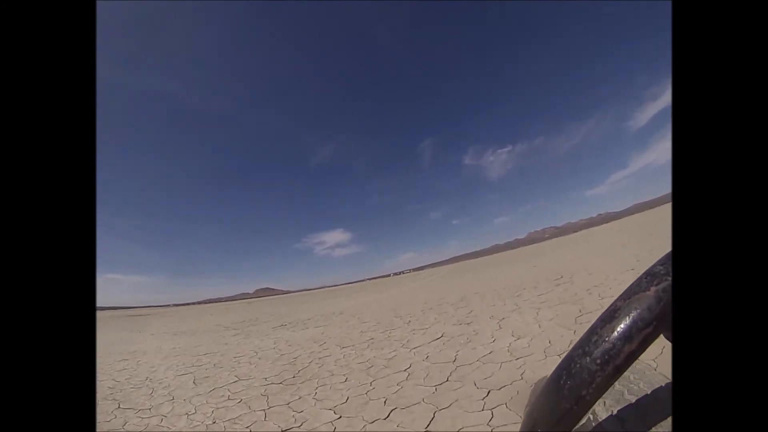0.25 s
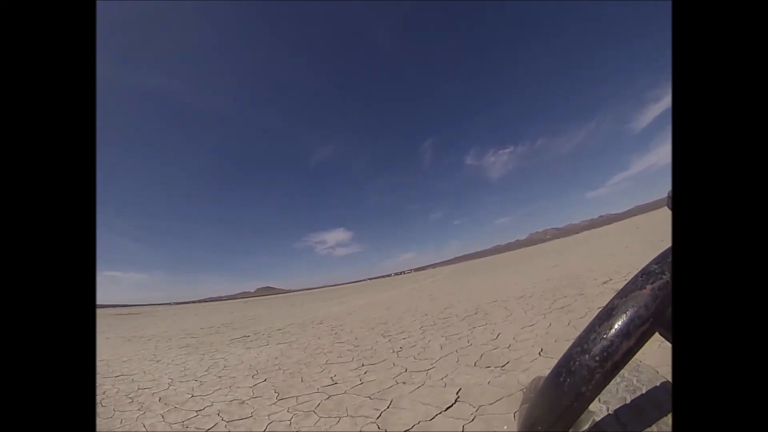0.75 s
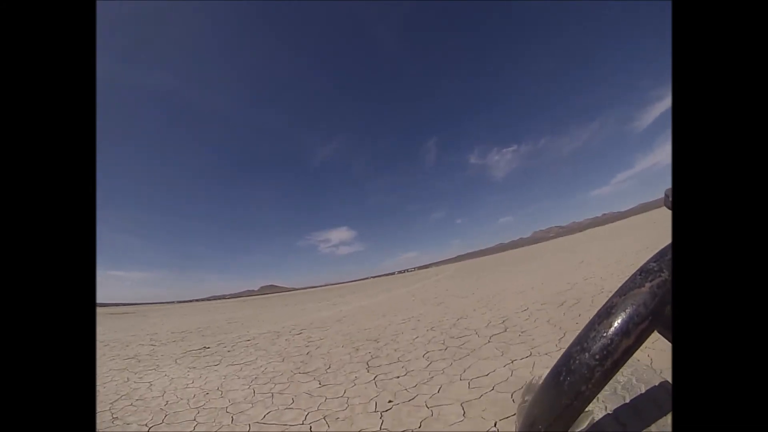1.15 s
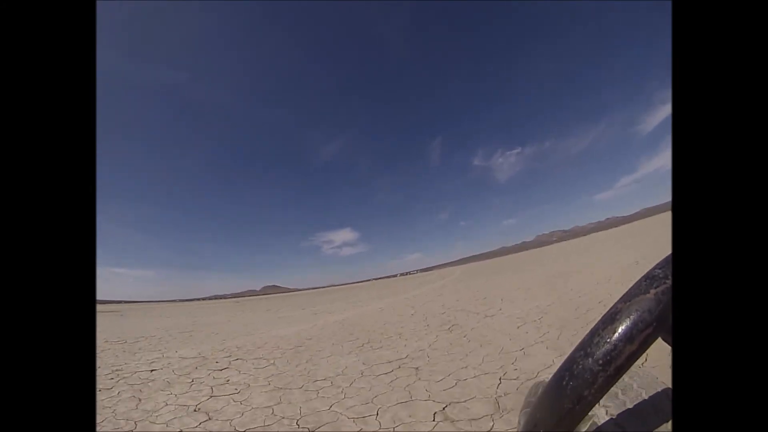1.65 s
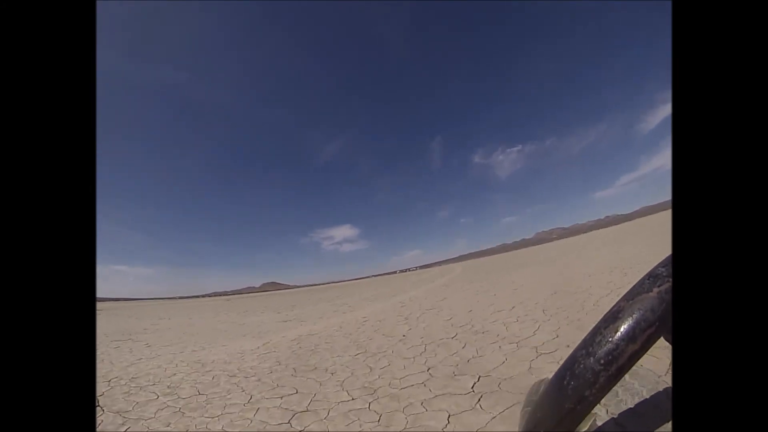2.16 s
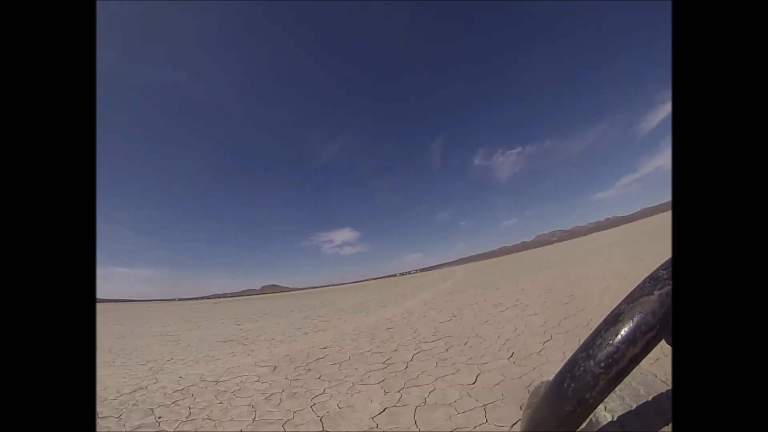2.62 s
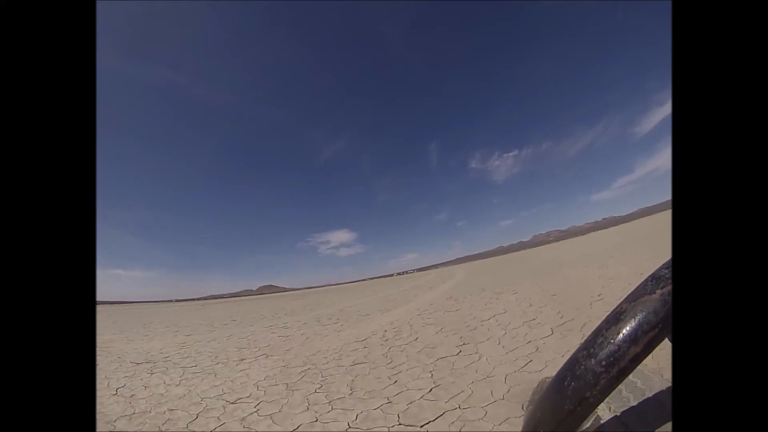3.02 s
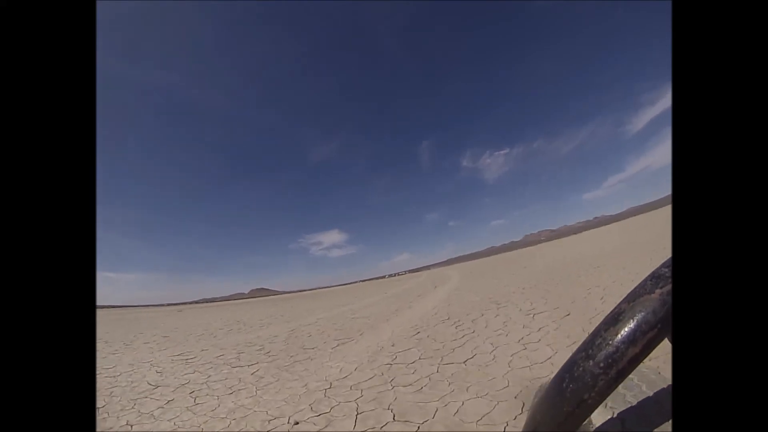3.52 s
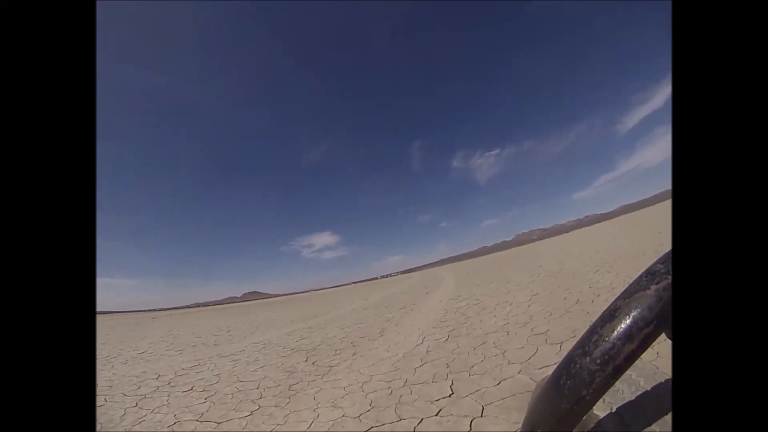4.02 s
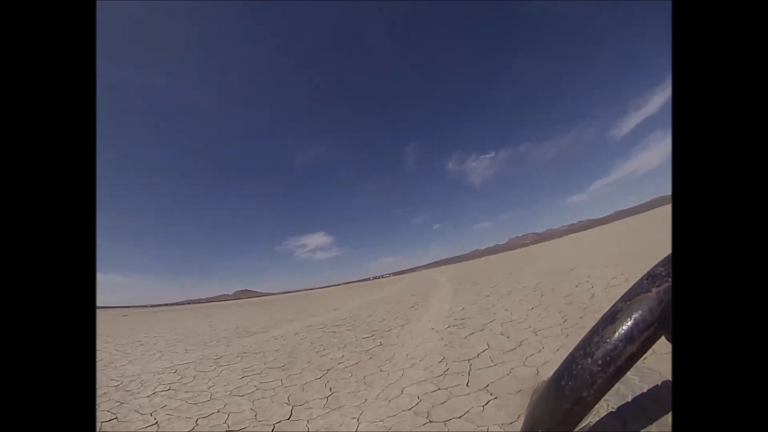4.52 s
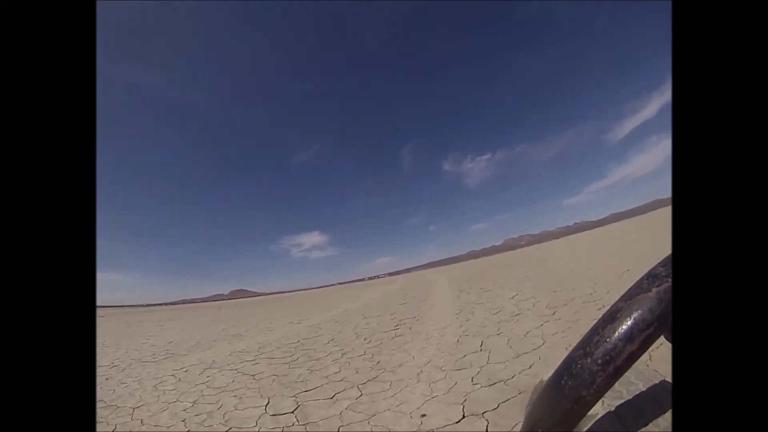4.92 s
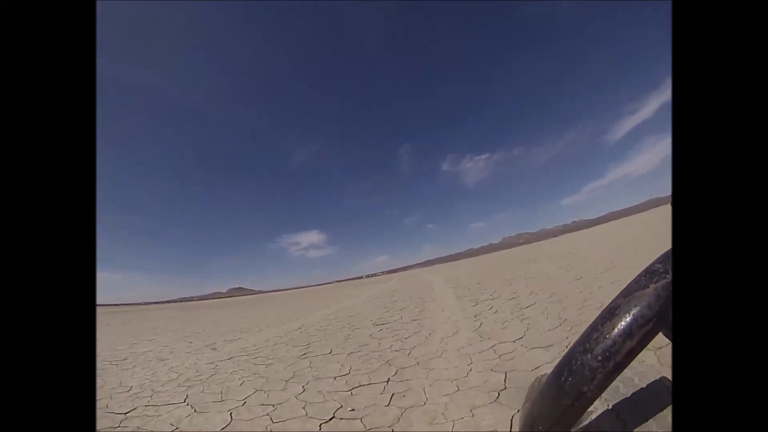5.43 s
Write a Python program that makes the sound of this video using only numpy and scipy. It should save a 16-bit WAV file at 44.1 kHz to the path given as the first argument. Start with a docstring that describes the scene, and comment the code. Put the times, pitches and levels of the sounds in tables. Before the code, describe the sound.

An unpowered wheeled craft rolls over a cracked dry lakebed, heard in mono from its tube frame through a boxy camera housing, with no echo. Uneven low rumble and a droning frame continue throughout, broken by dull tyre thumps and hollow frame jolts. In the first 0.7 s a taut rope ticks and gives short, raspy creaks. From 0.7 to about 1.5 s a ratchet block snaps quickly, each metallic click ringing briefly, over more creaking; a tiny squeak comes near 1.0 s. The rope then slips in scattered duller ticks, and the ratchet returns at 1.8-2.05 s, with two fainter clicks around 2.4 s. Mud plates crumble more often from 2.4 s. From 3.3 s hard hollow knocks of loose fittings crowd together over faster bumps. Gritty sand sprays hiss briefly near 4.1 and 4.8 s, then more strongly from 5.25 s, rattling on until the end at about 5.7 s.

```python
"""An unpowered land yacht rolls over a cracked dry lakebed, heard on its tube frame by a camera housing.
From the start noise-driven resonances rumble, cracks ring the frame, and the rope ticks and creaks by stick and slip.
From 0.7 s to 2.5 s the rope is hauled through a ratchet block: noisy pawl snaps with ringing sine modes.
Later, with more speed, loose fittings knock often; mud plates crumble and, from about 4 s, sand sprays,
made of noise bursts and random grains through shaped bodies."""
import sys
import numpy as np
from scipy import signal
from scipy.fft import rfft, irfft
from scipy.io import wavfile
from scipy.ndimage import uniform_filter1d

SR = 44100
rng = np.random.default_rng(int(sys.argv[2]) if len(sys.argv) > 2 else 0)


def generate_wav(signal):
    """Clip the signal to [-1, 1] and save it as 16-bit WAV at the path in sys.argv[1]."""
    frames = np.transpose(np.atleast_2d(signal))
    scaled = np.clip(frames, -1, 1) * 32767
    pcm = np.round(scaled).astype(np.int16)
    wavfile.write(sys.argv[1], SR, pcm)


N = 250047
TIME = np.arange(N) / SR
HIT_SIZE = 8192  # samples in the longest impulse response
CUTOFF_HZ = 15500

# Event and level tables hold nominal levels: some sources trim them where they mix.
# roughness of the ground, which shakes the whole chassis: start_s, level_db
GROUND_ROUGHNESS = [(0.0, -15.5), (0.25, -22.5), (0.47, -24), (0.61, -15.5), (0.95, -23.5), (1.25, -17.5),
                    (1.5, -29), (1.74, -21.5), (2.18, -17.5), (2.32, -18), (2.61, -26.5), (3.06, -20.5),
                    (3.36, -18), (4.17, -19), (4.66, -20), (5.15, -15.5), (5.37, -20), (5.67, -17)]
# level at mean roughness, and the share of the ground's swing that each part follows
HEAVE_DB, HEAVE_FOLLOWS = -21.5, 0.61
TYRE_DB, TYRE_FOLLOWS = -24.5, 1
FRAME_DB, FRAME_FOLLOWS = -24, 1
CRUNCH_DB, CRUNCH_FOLLOWS = -40.5, 0.79  # the crumbs follow by the same share
# colour of the heaving chassis, the tyres and the frame: pitch_hz, level_db (relative)
HEAVE_SPECTRUM = [(4, -40), (12, -12), (20, -7), (30, -5), (42, 0), (54, 0), (68, -12), (110, -42),
                  (1000, -110)]
TYRE_SPECTRUM = [(10, -60), (35, -32), (55, -8), (68, -2), (82, 0), (100, -6), (125, -15), (220, -45),
                 (2000, -110)]
FRAME_SPECTRUM = [(20, -65.5), (70, -25), (120, -8.5), (150, 0), (185, 1.5), (215, 1.5), (235, -1),
                  (262, -0.5), (305, -13), (380, -20.5), (480, -28), (800, -50.5), (4000, -110)]

# colour of the crunching crust, and of crackling mud: pitch_hz, level_db (relative)
CRUNCH_SPECTRUM = [(50, -59), (200, -14), (340, 3.5), (440, 6), (620, -1), (900, -7), (1200, -17),
                   (2200, -31.5), (3300, -46), (4500, -46.5), (8000, -45), (15000, -89)]
CRACKLE_SPECTRUM = [(200, -22.5), (700, 5.5), (1400, -0.5), (2000, -2.5), (2500, -5), (3300, -7.5),
                    (3800, -31), (5000, -35), (7000, -36), (15000, -64)]
# small crumbs break at random: how many, and when each crackle peaks
CRUMBS_PER_S, CRUMB_PEAK_S = 86, 0.0041
# level of the crumbs at mean roughness, higher towards the end: start_s, level_db
CRUMB_CURVE = [(0, -61.5), (1.7, -52), (3.1, -57.5), (3.4, -55.5), (4.4, -49.5), (5.67, -47.5)]
# level of the fine dust hiss under the tyres: start_s, level_db
DUST_CURVE = [(0, -50.5), (.09, -74), (.19, -68), (.6, -68), (.9, -68.5), (1.3, -61), (1.47, -75.5),
              (1.78, -73), (1.95, -70), (2.47, -69.5), (2.6, -79.5), (3.2, -72.5), (4.1, -74), (5.1, -72),
              (5.67, -77.5)]
# colour of the dust hiss: pitch_hz, level_db (relative)
DUST_SPECTRUM = [(100, -42), (800, -9), (2000, -8), (3000, -6.5), (3400, -10), (4250, -14.5), (4700, -20),
                 (6200, -25), (7200, -26), (11000, -25), (15000, -62)]
# level of the coarser sand that sprays up at speed: start_s, level_db
SAND_CURVE = [(3.7, -89.5), (3.95, -62.5), (4.12, -52.5), (4.26, -64), (4.4, -70), (4.64, -63.5),
              (4.8, -50), (4.94, -62.5), (5.15, -62), (5.27, -44.5), (5.34, -51), (5.43, -44),
              (5.54, -45.5), (5.67, -58)]
# colour of the sand spray: pitch_hz, level_db (relative)
SAND_SPECTRUM = [(300, -28.5), (1100, -16.5), (1270, -3.5), (1430, 7.5), (1600, -4), (1800, -9.5),
                 (2300, -14), (2850, 1.5), (3150, 11), (3450, 9), (3900, -4), (4130, -10), (4330, -5),
                 (4650, -25.5), (5300, -25), (5750, -19.5), (6100, -19.5), (6550, -19), (6900, -32),
                 (11000, -39), (15000, -58.5)]
SAND_FLUTTER_DB = 2  # rms unevenness of the spray

# plates of mud that break under a tyre: crest_s, length_s, thud_db, crackle_db
MUD_PLATES = [(0.206, 0.0043, -38, -41.5), (0.25, 0.0054, -23, -47), (1.108, 0.0098, -21, -42),
              (1.477, 0.0045, -21, -43), (1.814, 0.0068, -20, -46), (2.102, 0.0067, -25, -38),
              (2.289, 0.0037, -22, -42), (2.406, 0.0049, -25, -35.5), (2.512, 0.012, -22.5, -33),
              (2.664, 0.0089, -23, -35), (2.706, 0.0055, -24, -63), (2.818, 0.0058, -21, -51),
              (2.885, .012, -35, -43), (3.024, 0.0052, -20.5, -44.5), (3.229, 0.0052, -22, -49),
              (3.356, 0.011, -24.5, -37), (3.433, 0.014, -19, -37), (3.495, 0.018, -26.5, -36.5),
              (3.529, 0.0036, -33, -34.5), (3.576, 0.017, -24, -42), (3.643, 0.0092, -24, -40.5),
              (3.715, 0.023, -26.5, -59), (3.751, 0.0072, -27.5, -34.5), (3.802, 0.017, -20.5, -37),
              (3.943, 0.012, -20.5, -36), (4.007, 0.026, -32.5, -38), (4.091, 0.017, -19.5, -46.5),
              (4.121, 0.011, -17, -37), (4.21, 0.0058, -15.5, -47), (4.398, 0.013, -24.5, -35.5),
              (4.456, 0.0079, -37, -35), (4.513, 0.012, -25.5, -48), (4.621, 0.022, -25, -44),
              (4.65, 0.014, -36, -37.5), (4.76, 0.0085, -29, -33), (4.892, 0.01, -39, -41.5),
              (5.044, .006, -18.5, -43), (5.076, .005, -20.5, -45), (5.191, 0.0066, -25, -43),
              (5.257, 0.015, -20.5, -46), (5.412, 0.025, -28, -37), (5.469, 0.0069, -19.5, -45),
              (5.533, 0.0064, -33, -48), (5.647, 0.0063, -23, -44)]
# colour of a plate's dull thud: pitch_hz, level_db (relative)
THUD_SPECTRUM = [(100, -31), (220, -7), (310, 6), (450, 3.5), (640, -0.5), (850, -11.5), (1200, -19),
                 (2500, -46), (8000, -78)]

# wheels crossing cracks: crest_s, length_s, frame_ring_hz, frame_db, tyre_thump_db, clatter_db
CRACK_BUMPS = [(0.051, 0.049, 230, -10.5, -26, -24), (0.132, 0.032, 241, -9.5, -34, -22.5),
               (0.429, 0.041, 254, -13.5, -11.5, -19.5), (0.579, 0.027, 212, -7.5, -15, -15.5),
               (0.613, 0.039, 190, -20.5, -8.5, -23.5), (0.685, 0.024, 220, -4, -6.5, -23),
               (0.848, 0.023, 203, -10.5, -4.5, -22), (1.02, 0.018, 227.7, -9.5, -10.5, -20),
               (1.057, 0.031, 205, -10, -11, -22), (1.18, 0.034, 220, -5.5, -32, -24),
               (1.253, 0.016, 212, -4, -32, -25), (1.276, 0.02, 210, -4, -35, -21),
               (1.365, .015, 200, -33, -15, -33), (1.402, 0.022, 245, -6.5, -7, -16),
               (1.49, 0.031, 209.3, -8, -5, -22.5), (1.55, 0.024, 200, -15, -11, -36),
               (1.667, 0.04, 192.4, -13, -23, -37), (1.814, 0.011, 217, -10.5, -3.5, -45),
               (1.916, 0.011, 200, -21, -7, -29), (2.036, 0.023, 229.2, -9, -4.5, -18),
               (2.102, 0.0088, 255.4, -8.5, -34, -27), (2.178, 0.016, 167, -18, -9.5, -51),
               (2.221, 0.017, 176, -21, -4.5, -31.5), (2.258, 0.011, 200, -33, -10.5, -34),
               (2.3, 0.022, 266, -4.5, -4.5, -18), (2.397, .014, 215, -14, -27, -36),
               (2.479, 0.024, 210, -9, -4, -19.5), (2.523, 0.0092, 233, -4, -13.5, -22),
               (2.687, 0.037, 210, -12.5, -13.5, -46), (2.913, 0.017, 200, -18.5, -10, -35),
               (3.024, 0.018, 224, -13, -13, -21), (3.085, .014, 200, -25, -13.5, -40),
               (3.157, 0.013, 180, -36.5, -13, -44), (3.217, 0.0065, 161, -10, -6.5, -24),
               (3.313, 0.01, 200, -27, -8, -45), (3.357, .014, 200, -15.5, -10, -33),
               (3.428, 0.012, 213, -8.5, -4, -35), (3.45, 0.048, 175.0, -13, -5.5, -23.5),
               (3.492, .014, 190, -29, -10, -38), (3.534, 0.031, 195.0, -26, -4, -44.5),
               (3.572, 0.011, 182, -3.5, -16, -30), (3.639, 0.0057, 217, -9, -11, -36),
               (3.74, 0.013, 219, -7.5, -45, -27.5), (3.841, 0.011, 209, -9, -16, -29),
               (3.892, 0.022, 200, -7.5, -28.5, -23.5), (3.954, 0.026, 212, -18, -4, -33),
               (3.985, .014, 190, -20.5, -10, -34.5), (4.087, 0.015, 219, -10.5, -25.5, -23),
               (4.136, 0.033, 170, -8, -6.5, -27), (4.165, 0.015, 189, -11, -10, -30.5),
               (4.211, 0.037, 177.5, -7.5, -25, -23.5), (4.262, 0.01, 181, -11.5, -7, -31),
               (4.308, 0.0089, 195, -11, -16, -15), (4.352, 0.011, 200, -17, -19, -40),
               (4.39, 0.014, 223, -4.5, -2, -26.5), (4.479, .014, 200, -23, -9.5, -39),
               (4.518, 0.0091, 205, -17.5, -23, -36.5), (4.568, 0.021, 190, -33, -14, -42),
               (4.599, 0.017, 174.6, -9, -11.5, -33), (4.651, 0.028, 206, -9, -5.5, -25.5),
               (4.691, 0.015, 197, -14.5, -6.5, -23.5), (4.767, 0.026, 242, -5, -22, -16.5),
               (4.841, .012, 205, -13, -20, -37.5), (4.891, 0.032, 179, -8.5, -7, -20),
               (4.924, 0.006, 194.4, -8.5, -25, -32), (4.971, 0.02, 189.4, -34, -6, -28),
               (5.01, 0.015, 200, -15, -24, -25.5), (5.045, 0.022, 199.5, -10.5, -30, -26),
               (5.102, 0.0092, 211, -9.5, -37.5, -26.5), (5.187, 0.014, 201, -8, -5, -22),
               (5.249, 0.01, 253, -12, -3.5, -16), (5.305, 0.0084, 234, -6.5, -0.5, -25),
               (5.396, 0.0078, 235, -10.5, -25, -21.5), (5.497, 0.0072, 200, -12, -6, -29),
               (5.543, 0.0084, 191, -9, -16, -42), (5.606, 0.013, 214, -13.5, -4.5, -26),
               (5.657, 0.038, 230, -12, -5, -49)]
# colour of the clattering frame: pitch_hz, level_db (relative)
CLATTER_SPECTRUM = [(50, -66), (200, -15), (340, 2), (440, -2), (620, -8.5), (900, -13), (1200, -18.5),
                    (2200, -33.5), (3300, -42.5), (4500, -52), (8000, -63.5), (15000, -86)]
# a jolt favours one resonance of the frame: its width, and the level it adds
RING_WIDTH_HZ, RING_DB = 26, 4.5

# loose fittings striking the frame: start_s, clack_db, hollow_body_db, bright_edge_db
FITTING_KNOCKS = [(0.145, -56, -3, -68), (1.037, -31, -6, -62), (3.278, -24.5, -8, -54),
                  (3.367, -25.5, -7.5, -58), (3.455, -17.5, -5, -47.5), (3.49, -37, -27.5, -70),
                  (3.548, -23.5, -6, -53.5), (3.566, -41, -30.5, -67), (3.625, -24.5, -9, -54),
                  (3.666, -16, -35, -49), (3.682, -26.5, -11, -53), (3.74, -21.5, -37, -75),
                  (3.779, -41, -33.5, -77), (3.789, -25.5, -16, -83), (3.866, -21.5, -6, -69),
                  (3.889, -23.5, -3.5, -63), (3.927, -24.5, -5, -54.5), (3.955, -32, -29, -75),
                  (3.966, -18, -2, -55), (3.971, -21.5, -8.5, -64), (4.09, -34.5, -34, -64),
                  (4.115, -29.5, -23, -69), (4.143, -39, -22, -70), (4.2, -26, -9.5, -69),
                  (4.256, -33, -35, -70), (4.301, -17.5, -16.5, -59), (4.373, -42, -26.5, -73),
                  (4.47, -25.5, -25, -72), (4.508, -46, -32, -72), (4.523, -39, -22, -71),
                  (4.593, -19.5, -8, -64), (4.637, -28, -33.5, -64.5), (4.682, -38, -20, -71),
                  (4.715, -26, -11, -55), (4.758, -28, -9, -56), (4.851, -17.5, -16, -74),
                  (4.895, -31, -16.5, -71), (4.91, -29, -14, -75), (5.125, -24.5, -14.5, -73),
                  (5.149, -37, -14, -72), (5.183, -28.5, -9, -73), (5.222, -24, -6, -77),
                  (5.245, -23, -23, -72), (5.303, -26.5, -44, -53), (5.366, -37, -30, -72),
                  (5.392, -26.5, -32, -67), (5.406, -22.5, -10, -68), (5.419, -26, -35, -72),
                  (5.483, -29, -16, -67), (5.493, -20.5, -8.5, -68.5), (5.594, -21.5, -11.5, -80)]
# colour of the clack, the hollow body and the bright edge: pitch_hz, level_db (relative)
CLACK_SPECTRUM = [(100, -56), (600, -13.5), (1200, 2.5), (1950, 2.5), (2450, -2.5), (3300, -7.5),
                  (3750, -42), (6000, -51), (15000, -97.5)]
HOLLOW_SPECTRUM = [(60, -31), (250, -6), (450, -1), (850, 7.5), (1020, -1), (1300, -7.5), (2500, -63.5),
                   (10000, -96)]
EDGE_SPECTRUM = [(500, -43.5), (2500, -25.5), (3500, -21), (4200, -12.5), (4750, 11), (5300, -4),
                 (6200, 1.5), (8000, -14.5), (9500, -18), (11000, -25), (15000, -41)]
TUBE_HZ, TUBE_T60_S = 915, 0.029  # hollow ring of a frame tube, before each knock's detuning

# rub of the running rope over its sheave between the slips: start_s, level_db
RUB_CURVE = [(0.1, -59), (0.2, -43), (0.55, -45), (0.66, -49), (0.8, -41.5), (1.03, -45.5), (1.1, -48),
             (1.3, -49), (1.42, -51), (1.52, -65), (1.8, -62), (1.9, -50), (2.25, -54.5), (2.6, -70.5),
             (3.2, -80)]
# thin squeaks of the rope in its sheave: crest_s, length_s, pitch_hz, level_db
SHEAVE_SQUEAKS = [(0.157, .004, 6100, -50), (0.989, 0.0035, 2075, -27), (2.91, 0.0048, 5950, -57)]
SQUEAK_RISE_PER_S = 4  # upward glide, as a share of the pitch

# single slips of the rope: start_s, level_db
ROPE_SLIPS = [(0.008, -23.5), (0.026, -23), (0.103, -20.5), (0.121, -31), (0.155, -33.5), (0.171, -25.5),
              (0.181, -26), (0.382, -21.5), (0.43, -38), (0.559, -24), (0.565, -23.5), (0.582, -27),
              (0.599, -24), (0.606, -23), (0.623, -22.5), (0.633, -20), (0.646, -25.5), (0.672, -21),
              (0.692, -19.5), (0.712, -23.5), (1.238, -36), (1.259, -18.5), (1.286, -25), (1.453, -25),
              (1.458, -32), (1.494, -36), (1.597, -29), (1.646, -32), (1.661, -21), (1.687, -40),
              (1.714, -35), (1.749, -21), (1.771, -28.5), (1.785, -33), (1.839, -25), (1.869, -20),
              (1.882, -17), (1.959, -25.5), (2.031, -17), (2.084, -23.5), (2.115, -21.5), (2.125, -20),
              (2.214, -27), (2.221, -20.5), (2.233, -19), (2.254, -26.5), (2.303, -24), (2.325, -24),
              (2.421, -24), (2.446, -30), (2.481, -24), (2.581, -27), (2.645, -29.5), (2.711, -24.5),
              (2.735, -30), (2.771, -23.5), (2.787, -30), (2.853, -23.5), (2.877, -29.5), (2.907, -26.5),
              (2.917, -26), (2.961, -27.5), (2.983, -27), (2.99, -32), (3.009, -27.5), (3.07, -29.5),
              (3.076, -29), (3.09, -36.5), (3.104, -24), (3.143, -34), (4.54, -30.5), (4.842, -26.5),
              (4.874, -34), (4.963, -27.5), (5.009, -32), (5.03, -36), (5.069, -28.5), (5.103, -32.5),
              (5.208, -39), (5.274, -41), (5.47, -25), (5.635, -40)]
# creaks: start_s, length_s, first_slips_per_s, middle_slips_per_s, last_slips_per_s, level_db
ROPE_CREAKS = [(0.108, 0.019, 310, 206, 170, -26.5), (0.182, 0.077, 219, 258, 224, -25.5),
               (0.27, 0.098, 160, 340, 260, -26), (0.357, 0.016, 230, 230, 290, -23),
               (0.39, .026, 150, 170, 170, -26), (0.454, 0.099, 366, 266, 133, -23.5),
               (0.777, 0.17, 115, 125, 79, -26), (0.991, 0.061, 76, 148, 118, -26),
               (1.315, 0.13, 276, 302, 323, -26), (2.192, 0.028, 320, 190, 195, -24.5),
               (2.826, 0.013, 505, 280, 190, -24.5), (2.89, 0.017, 150, 230, 280, -35),
               (3.015, 0.015, 150, 170, 200, -27), (3.039, 0.026, 270, 270, 270, -24.5),
               (4.806, 0.048, 117, 340, 106, -58), (4.978, 0.012, 170, 160, 144, -31.5),
               (5.111, .022, 97, 114, 140, -34.5)]
# a taut rope slips more sharply than a slack one: start_s, slip_top_hz
ROPE_TENSION = [(0, 4600), (1.051, 4230), (1.3, 2560), (2.2, 2598), (2.75, 2550), (2.9, 2850), (3.15, 2940),
                (4.8, 4510)]
# colour of the rope's slips and rub: pitch_hz, level_db (relative)
ROPE_SPECTRUM = [(100, -11), (450, -16.5), (620, 5), (900, 1), (1200, 1), (1450, -1), (1900, 0.5),
                 (2100, -6), (2350, 0.5), (2750, -4.5), (2980, -5.5), (3250, 3), (3450, 0), (3580, -15),
                 (3850, -23.5), (4100, -18), (4500, -24.5), (5150, -36), (5700, -15.5), (6200, -26.5),
                 (6900, -43), (11000, -33.5), (15000, -49.5)]
# a harder slip frees more rope, which then sticks longer: level per doubling of the typical wait
STICK_DB_PER_DOUBLING, STICK_S = 4.5, 0.0061
SCRAPE_DB, SCRAPE_S = -21, 0.0013  # scrape of the fibres: level against the jerk, fading time
# bending waves run through the frame more slowly in the bass: lag at 0 Hz, pitch that has no lag
BASS_LAG_S, NO_LAG_HZ = .002, 3600

# pawl of the ratchet block: start_s, ring_db (follows the load), deep_mode_db
RATCHET_CLICKS = [(0.6881, -21.5, -17), (0.745, -27.5, -27), (0.792, -23, -17), (.828, -22, -19),
                  (0.8643, -21.5, -21), (0.894, -25, -19), (0.926, -35, -19), (0.954, -21, -26),
                  (0.9812, -20, -25), (1.0085, -20.5, -25), (1.0443, -23.5, -18), (1.084, -19, -23),
                  (1.1247, -23, -22), (1.158, -20, -26), (1.1902, -22, -23), (1.2147, -23, -22),
                  (1.2354, -20, -17), (1.2576, -28, -21), (1.2835, -36, -23), (1.306, -34.5, -32),
                  (1.3284, -47, -38), (1.3535, -31.5, -25), (1.387, -58, -44), (1.4243, -64.5, -43),
                  (1.4904, -59.5, -48), (1.828, -32, -32), (1.864, -26.5, -17.5), (1.894, -31, -20),
                  (1.927, -29, -24), (1.9602, -36, -19), (1.9968, -36, -24), (2.054, -29, -27),
                  (2.41, -32.5, -22.5), (2.475, -45, -32)]
# ringing of the block before detuning, the deep mode first: pitch_hz, level_db (relative), t60_s
BLOCK_RINGS = [(671, 1, 0.016), (908, -7, 0.028), (1370, 0, 0.065), (1469, -11, .03), (1646, -18, .03),
               (1890, -10, 0.027), (2290, -32, .03), (3630, -24, 0.02), (4022, -22, 0.059),
               (4380, -35, .04)]
# colour of the pawl: pitch_hz, level_db (relative)
PAWL_SPECTRUM = [(200, -31), (600, 3.5), (1500, 10.5), (2600, -10.5), (3800, 10), (4750, -12), (5600, -2.5),
                 (6100, -10), (6600, -4), (6900, -9.5), (7300, -6), (7900, -1), (8700, -18), (10050, 3),
                 (10900, -11), (11350, -5.5), (11800, -16), (12900, -18), (13500, -7.5), (15000, -16)]
# the spring drives the snap, so it hardly follows the load: levels at mean load, share followed
SNAP_DB, SPRING_DB, SNAP_FOLLOWS = -30.5, -50, 0.1
SPRING_HZ, SPRING_T60_S = 10300, .055  # thin ring of the pawl spring, before detuning
# the block shudders as the tooth passes: crest and width of the shudder, level of the ring left over
SHUDDER_CREST_S, SHUDDER_S, AFTER_RING_DB = 0.0079, 0.0046, -1
# its loose cheeks rattle too: level at mean load, share of the load followed
BLOCK_RATTLE_DB, BLOCK_RATTLE_FOLLOWS = -35, 0.11

# resonances and dips of the camera housing: pitch_hz, width_hz, level_db
HOUSING_BANDS = [(505.5, 54, -9), (609, 14, 4.5), (930, 140, 5.5), (1114, 360, -9.5), (1352, 7, 7),
                 (1919, 40, 5.5), (2195, 490, -4.5), (2351, 120, 6), (2762, 210, -9), (3336, 540, -5.5)]


def from_db(db):
    """Decibels to gain."""
    return 10 ** (np.asarray(db) / 20)


def rms_one(x):
    """Scale to rms 1."""
    return x / np.sqrt(np.mean(x ** 2) + 1e-20)


def crest_one(x, window_s):
    """Scale so that the envelope, averaged over the window, tops at 1."""
    power = uniform_filter1d(x * x, max(int(window_s * SR), 1))
    return x / np.sqrt(2 * power.max() + 1e-20)


def in_time(curve):
    """The level of a curve at every sample."""
    s, level = np.transpose(curve)
    return np.interp(TIME, s, level)


def add(out, sound, s):
    """Mix a sound in from time s."""
    at = int(round(s * SR))
    sound, at = sound[max(-at, 0):], min(max(at, 0), N)
    out[at:at + len(sound)] += sound[:N - at]


def response(spectrum):
    """Causal (minimum-phase) impulse response of a body with this spectrum."""
    hz, db = np.transpose(spectrum)
    grid = np.maximum(np.arange(HIT_SIZE // 2 + 1) * SR / HIT_SIZE, 1)
    gain = from_db(np.interp(np.log(grid), np.log(hz), db))
    # folding the cepstrum forward in time gives minimum phase
    cepstrum = irfft(np.log(gain))
    cepstrum[1:HIT_SIZE // 2] *= 2
    cepstrum[HIT_SIZE // 2 + 1:] = 0
    return irfft(np.exp(rfft(cepstrum)))


def retuned(spectrum, pitch):
    """Response of a body whose whole spectrum is shifted by a pitch factor."""
    return response(np.array(spectrum) * [pitch, 1])


def through(force, body):
    """What a body makes of a force."""
    return signal.fftconvolve(force, body)[:N]


def grains(per_s, spread_db):
    """Random contacts of uneven size."""
    sizes = from_db(spread_db * np.minimum(rng.exponential(1, N), 4))
    return (rng.random(N) < per_s / SR) * sizes * rng.standard_normal(N)


def jolt(body, length_s, window_s):
    """A swell of rough contact, cresting 40 ms in, rings a body."""
    t = np.arange(int(.08 * SR)) / SR - .04
    force = rng.standard_normal(len(t)) * np.exp(-(t / length_s) ** 2)
    return crest_one(through(force, body), window_s)


def ground_swing():
    """Roughness of the ground in dB above its mean."""
    db = in_time(GROUND_ROUGHNESS)
    return db - db.mean()


def rumble(spectrum, steady_s):
    """Rough ground shakes a resonance; its swell is held even over steady_s."""
    shake = through(rng.standard_normal(N), response(spectrum))
    span = max(int(steady_s * SR), 1)
    power = uniform_filter1d(uniform_filter1d(shake ** 2, span), span)
    return shake / np.sqrt(np.abs(power) + 1e-12)


def rolling():
    """On rougher ground the chassis heaves, the tyres boom and the frame drones more."""
    swing_db = ground_swing()
    heave = from_db(HEAVE_DB + HEAVE_FOLLOWS * swing_db) * rumble(HEAVE_SPECTRUM, steady_s=0.17)
    tyres = from_db(TYRE_DB + TYRE_FOLLOWS * swing_db) * rumble(TYRE_SPECTRUM, steady_s=0.19)
    frame = from_db(FRAME_DB + FRAME_FOLLOWS * swing_db) * rumble(FRAME_SPECTRUM, steady_s=0.016)
    return heave + tyres + frame


def dust():
    """Dense fine grains hiss under the tyres."""
    hiss = rms_one(through(grains(per_s=12000, spread_db=1.2), response(DUST_SPECTRUM)))
    return from_db(in_time(DUST_CURVE) + 11.0) * hiss


def sand():
    """Coarser grains of very uneven size spray up in a fluttering stream."""
    slow_noise = uniform_filter1d(uniform_filter1d(rng.standard_normal(N), size=1500), size=1500)
    flutter_db = SAND_FLUTTER_DB * rms_one(slow_noise)
    spray = rms_one(through(grains(per_s=4400, spread_db=3.5), response(SAND_SPECTRUM)))
    return from_db(in_time(SAND_CURVE) + flutter_db) * spray


def crunch():
    """Uneven contacts crunch the dry crust, more on rough ground."""
    crust = rms_one(through(grains(per_s=1200, spread_db=3.0), response(CRUNCH_SPECTRUM)))
    return from_db(CRUNCH_DB + CRUNCH_FOLLOWS * ground_swing()) * crust


def crumbs():
    """Crumbs break at random, each a short swell of crackling noise, louder on rough ground."""
    age = np.arange(HIT_SIZE // 2) / SR / CRUMB_PEAK_S
    power = through(grains(CRUMBS_PER_S, spread_db=0.0) ** 2, (age * np.exp(-age)) ** 2)
    breaking = np.sqrt(np.abs(power)) * rng.standard_normal(N)
    crackle = rms_one(through(breaking, response(CRACKLE_SPECTRUM)))
    return from_db(in_time(CRUMB_CURVE) + CRUNCH_FOLLOWS * ground_swing()) * crackle


def crumbles():
    """A plate of mud gives way with a dull thud and a crackle, each plate with a pitch of its own."""
    out = np.zeros(N)
    for crest_s, length_s, thud_db, crackle_db in MUD_PLATES:
        pitch = np.exp(rng.normal(0, .06))
        for spectrum, level_db in (THUD_SPECTRUM, thud_db), (CRACKLE_SPECTRUM, crackle_db):
            sound = jolt(retuned(spectrum, pitch), length_s, window_s=.004)
            add(out, from_db(level_db) * sound, crest_s - .04)
    return out


def bumps():
    """Each crack thumps a tyre, rings the frame and sets it clattering."""
    out = np.zeros(N)
    frame, tyre, clatter = response(FRAME_SPECTRUM), response(TYRE_SPECTRUM), response(CLATTER_SPECTRUM)
    for crest_s, length_s, ring_hz, frame_db, thump_db, clatter_db in CRACK_BUMPS:
        start_s = crest_s - .04
        resonance = signal.lfilter(*signal.iirpeak(ring_hz, ring_hz / RING_WIDTH_HZ, fs=SR), frame)
        ringing = frame + from_db(RING_DB) * resonance
        # slower bodies are struck a little earlier
        ring = jolt(ringing, length_s * .5, window_s=0.0079)
        add(out, from_db(frame_db + 0.5) * ring, start_s - .006)
        thump = jolt(tyre, length_s * 0.35, window_s=0.013)
        add(out, from_db(thump_db - 4.5) * thump, start_s - .009)
        rattling = jolt(clatter, length_s * 0.36, window_s=0.019)
        add(out, from_db(clatter_db - 2.0) * rattling, start_s - .001)
    return out


def rattle(body, fade_s, bounce_s, bounce):
    """A hard contact that scuffs, then bounces twice."""
    t = np.arange(HIT_SIZE // 4) / SR
    force = 0.22 * rng.standard_normal(len(t)) * np.exp(-t / fade_s)
    landings = np.cumsum(rng.uniform(.6, 1.5, 2) * bounce_s * SR).astype(int)
    force[0] += 1
    force[np.minimum(landings, len(t) - 1)] += [bounce, bounce ** 2]
    return through(force, body)


def knocks():
    """Fittings with play in them strike the frame, each with a pitch and ring of its own."""
    out, t = np.zeros(N), np.arange(HIT_SIZE // 4) / SR
    for start_s, clack_db, hollow_db, edge_db in FITTING_KNOCKS:
        pitch = np.exp(rng.normal(0, .04))
        layers = (CLACK_SPECTRUM, clack_db), (HOLLOW_SPECTRUM, hollow_db - 11.0), (EDGE_SPECTRUM, edge_db)
        for spectrum, level_db in layers:
            body = retuned(spectrum, pitch)[:len(t)]
            knock = rattle(body, fade_s=0.0031, bounce_s=0.0026, bounce=0.81)
            add(out, from_db(level_db + 0.46) * crest_one(knock, window_s=0.0019), start_s)
        tube = from_db(-60 * t / TUBE_T60_S) * np.sin(2 * np.pi * TUBE_HZ * pitch * t)
        add(out, from_db(hollow_db - 23.5) * tube, start_s)
    return out


def rub():
    """Fibres catch one after another as the rope runs: a fine dry rasp."""
    rasp = rms_one(through(grains(per_s=1900, spread_db=3.0), response(ROPE_SPECTRUM)))
    return from_db(in_time(RUB_CURVE)) * rasp


def squeaks():
    """The rope catches in its sheave with a brief, rising, wavering squeak."""
    out, t = np.zeros(N), np.arange(-HIT_SIZE // 8, HIT_SIZE // 8) / SR
    for crest_s, length_s, pitch_hz, level_db in SHEAVE_SQUEAKS:
        waver = np.cumsum(rng.normal(0, .08, len(t)))
        phase = 2 * np.pi * pitch_hz * (t + SQUEAK_RISE_PER_S * t * t / 2) + waver
        add(out, from_db(level_db) * np.exp(-(t / length_s) ** 2) * np.sin(phase), crest_s + t[0])
    return out


def dispersed(body):
    """The frame spreads a sharp jerk into a short rounded burst, the treble arriving first."""
    size = 2 * len(body)
    hz = np.arange(size // 2 + 1) * SR / size
    lag_s = BASS_LAG_S * np.clip(1 - hz / NO_LAG_HZ, 0, 1)
    # summing the lag over frequency gives the phase
    phase = 2 * np.pi * np.cumsum(lag_s) * SR / size
    return irfft(rfft(body, size) * np.exp(-1j * phase))[:len(body)]


def slip(body, top_hz, trip_s, echo):
    """The rope lets go; the jerk runs along it and comes back, weaker each time."""
    force = np.zeros(HIT_SIZE // 8)
    trips = np.array([0, 1, 2.4, 3.4]) * trip_s
    force[np.clip((trips * SR).astype(int), 0, len(force) - 1)] = [1, echo, .12, .07]
    # the fibres scrape briefly as they slide
    fade = np.exp(-np.arange(len(force)) / SR / SCRAPE_S)
    force += from_db(SCRAPE_DB) * rng.standard_normal(len(force)) * fade
    softened = signal.lfilter(*signal.butter(5, np.clip(top_hz, 500, SR / 3), fs=SR), force)
    return through(softened + from_db(-43.5) * force, body)


def rope():
    """Stick and slip: lone ticks that run together into creaks at high slip rates; quick slips are small."""
    out, body = np.zeros(N), response(ROPE_SPECTRUM)[:HIT_SIZE // 4]
    body = dispersed(body / np.abs(body).max())
    tension = np.transpose(ROPE_TENSION)
    for start_s, level_db in ROPE_SLIPS:
        stretch = np.exp(rng.normal(0, .1))
        tick = slip(body, np.interp(start_s, *tension), trip_s=0.001745 * stretch, echo=0.68)
        add(out, from_db(level_db + 9.0) * tick, start_s)
    for start_s, length_s, *slips_per_s, level_db in ROPE_CREAKS:
        s, stretch = start_s, 1
        rate_times = start_s + length_s * np.linspace(0, 1, len(slips_per_s))
        while s < start_s + length_s:
            wait_s = 1 / max(np.interp(s, rate_times, slips_per_s), 20)
            wait_s *= np.exp(rng.normal(0, .1))
            slip_db = level_db + STICK_DB_PER_DOUBLING * np.log2(wait_s / STICK_S)
            slip_db += rng.normal(0, 1.6)
            # the free length of rope wanders, so the colour of the creak glides
            stretch *= np.exp(rng.normal(0, .025))
            tick = slip(body, np.interp(s, *tension), trip_s=0.0015 * stretch, echo=0.62)
            add(out, from_db(slip_db + 7.5) * tick, s)
            s += wait_s
    return out


def pawl_snap(pawl, t):
    """The pawl chatters over a tooth and lands again, as noise through its own body."""
    landing = t - rng.uniform(.0025, .0038)
    chatter = np.exp(-(t / 0.005) ** 1.3)
    chatter += 0.089 * (landing > 0) * np.exp(-np.abs(landing) / 0.0013)
    return crest_one(through(chatter * rng.standard_normal(HIT_SIZE), pawl), window_s=.001)


def pawl_spring(t):
    """The pawl spring rings thin and high, tuned and weighted a little differently each time."""
    spring_hz = SPRING_HZ * np.exp(rng.normal(0, .007))
    return from_db(rng.normal(0, 3) - 60 * t / SPRING_T60_S) * np.sin(2 * np.pi * spring_hz * t)


def block_ring(deep_offset_db, shudder, t):
    """Modes build up while the pawl chatters, and their pitch bends as the load shifts."""
    hz, mode_db, t60_s = np.transpose(BLOCK_RINGS)[:, :, None]
    # each tooth and load tunes and weights the modes a little differently
    detune = np.exp(rng.normal(0, .016, hz.shape))
    weight_db = mode_db + rng.normal(0, .8, hz.shape)
    weight_db[0] += deep_offset_db
    bend = 1 + rng.normal(0, .008, hz.shape) * (1 - np.exp(-t / .01))
    swell = (1 - np.exp(-t / 0.0023)) * (shudder + from_db(AFTER_RING_DB - 60 * t / t60_s))
    modes = swell * from_db(weight_db) * np.sin(2 * np.pi * hz * detune * bend * t)
    return modes.sum(axis=0)


def ratchet():
    """The pawl snaps over each tooth; its spring and the block ring, and the loose cheeks rattle."""
    out, t = np.zeros(N), np.arange(HIT_SIZE) / SR
    pawl, clack = response(PAWL_SPECTRUM)[:HIT_SIZE // 8], response(CLACK_SPECTRUM)
    mean_ring_db = np.mean(RATCHET_CLICKS, axis=0)[1]
    shudder = np.exp(-((t - SHUDDER_CREST_S) / SHUDDER_S) ** 2)
    for start_s, ring_db, deep_db in RATCHET_CLICKS:
        load_db = ring_db - mean_ring_db
        add(out, from_db(SNAP_DB + SNAP_FOLLOWS * load_db) * pawl_snap(pawl, t), start_s + .0004)
        add(out, from_db(SPRING_DB + SNAP_FOLLOWS * load_db) * pawl_spring(t), start_s)
        add(out, from_db(ring_db - 3.5) * block_ring(deep_db - ring_db, shudder, t), start_s)
        cheeks = crest_one(through(shudder * rng.standard_normal(HIT_SIZE), clack), window_s=0.0012)
        add(out, from_db(BLOCK_RATTLE_DB + BLOCK_RATTLE_FOLLOWS * load_db) * cheeks, start_s)
    return out


def housing(x):
    """The plastic case adds its own peaks and dips to the sound passed through it."""
    for pitch_hz, width_hz, level_db in HOUSING_BANDS:
        band = signal.lfilter(*signal.iirpeak(pitch_hz, pitch_hz / width_hz, fs=SR), x)
        x = x + (from_db(level_db) - 1) * band
    return x


def scene():
    """Ground, bumps, knocks and rope pass the housing; rolling, squeaks and ratchet join them in mono."""
    ground = dust() + sand() + crunch() + crumbs() + crumbles()
    housed = housing(ground + bumps() + knocks() + rub() + rope())
    return (rolling() + squeaks() + housed + ratchet())[None]


def record(dry):
    """The highest peaks are rounded and the top is cut."""
    rounded = dry / (1 + (dry / .95) ** 8) ** (1 / 8)
    return signal.sosfilt(signal.cheby2(12, 70, CUTOFF_HZ, fs=SR, output="sos"), rounded)


dry = scene()
out = record(dry)
generate_wav(out)
```